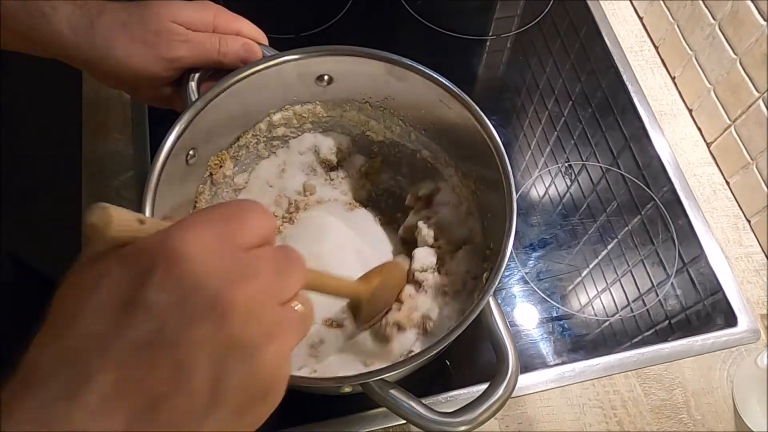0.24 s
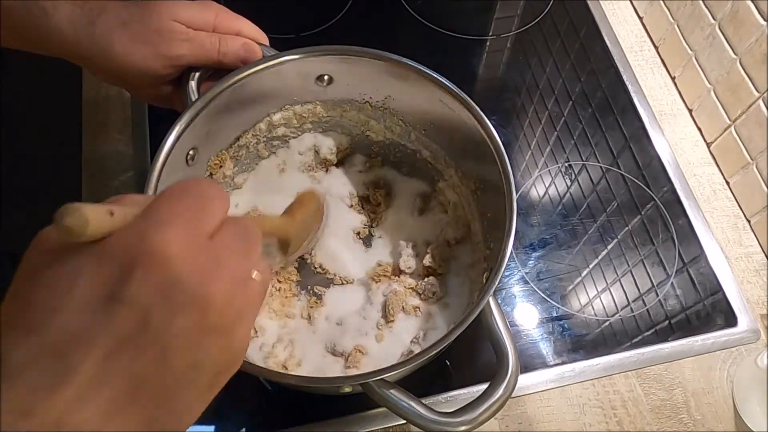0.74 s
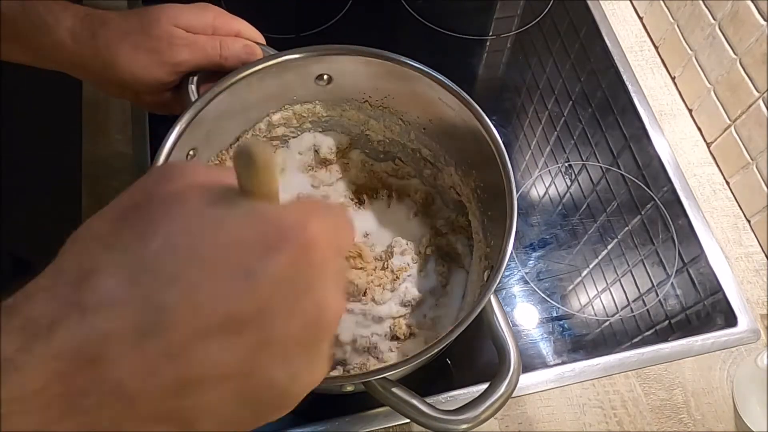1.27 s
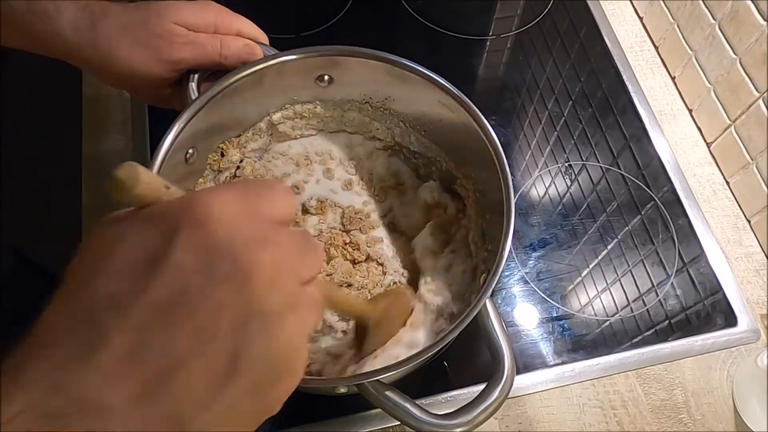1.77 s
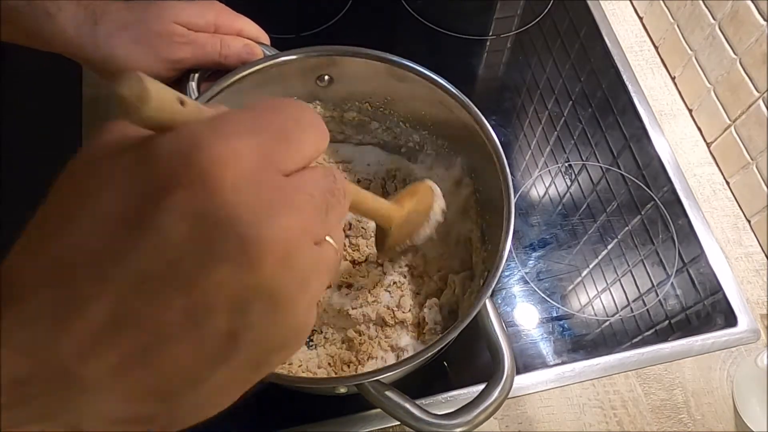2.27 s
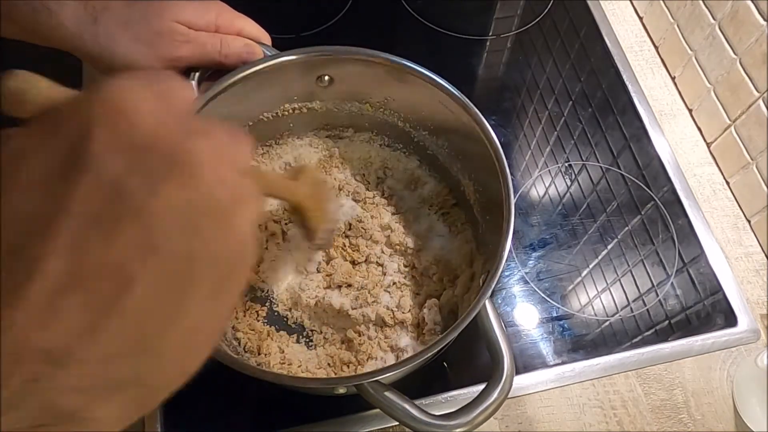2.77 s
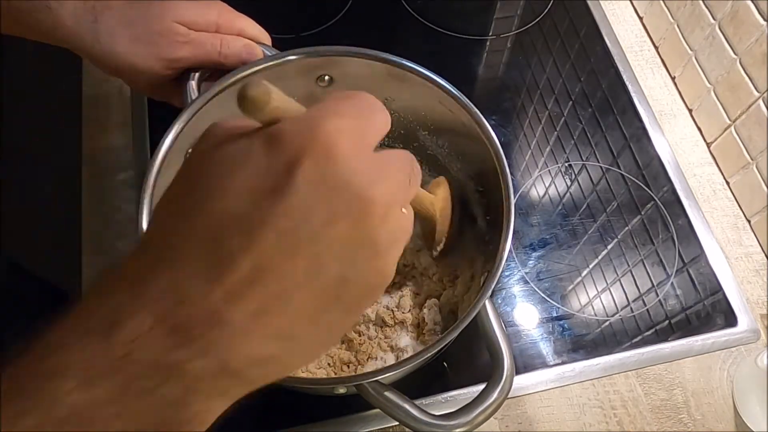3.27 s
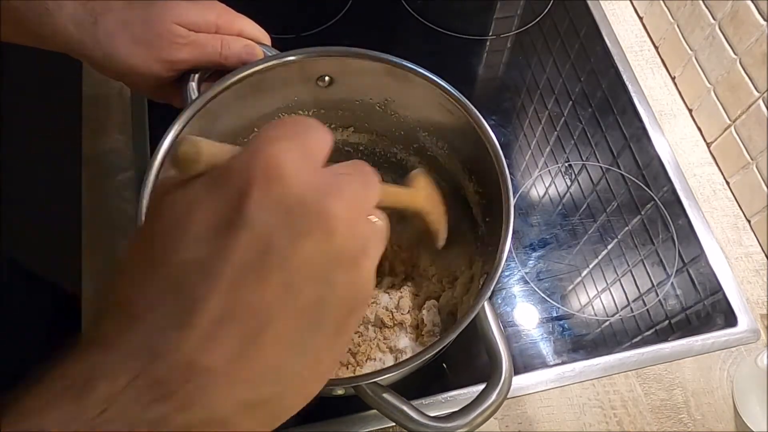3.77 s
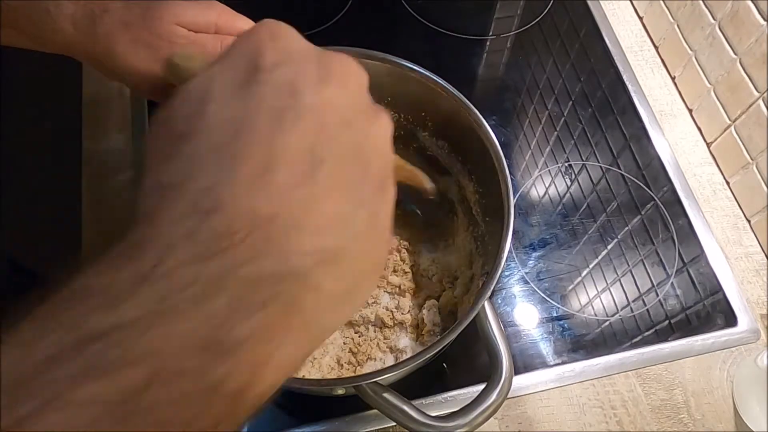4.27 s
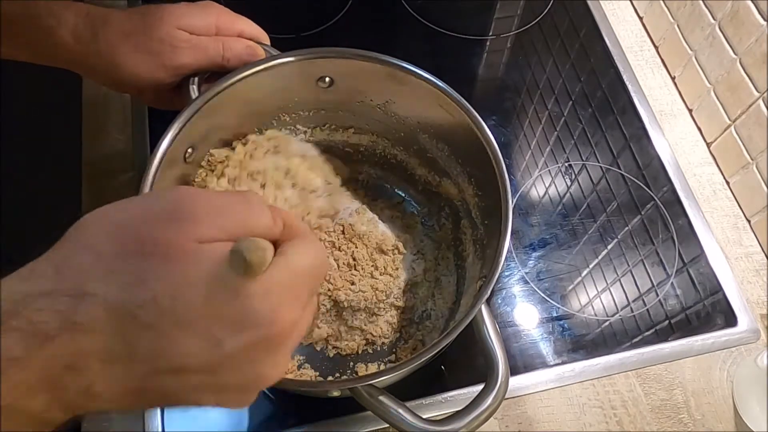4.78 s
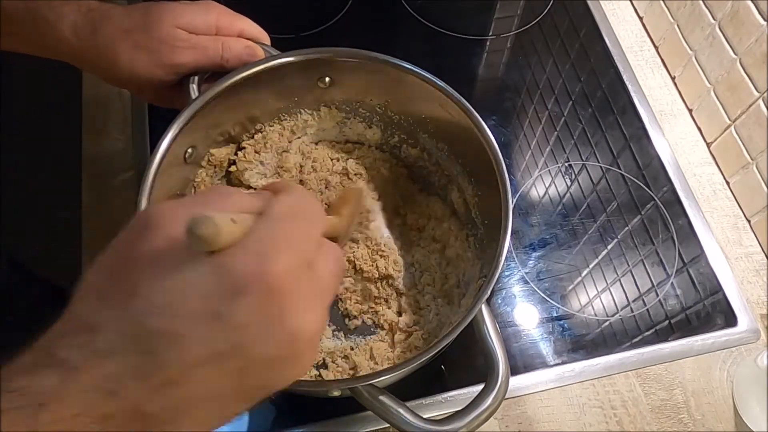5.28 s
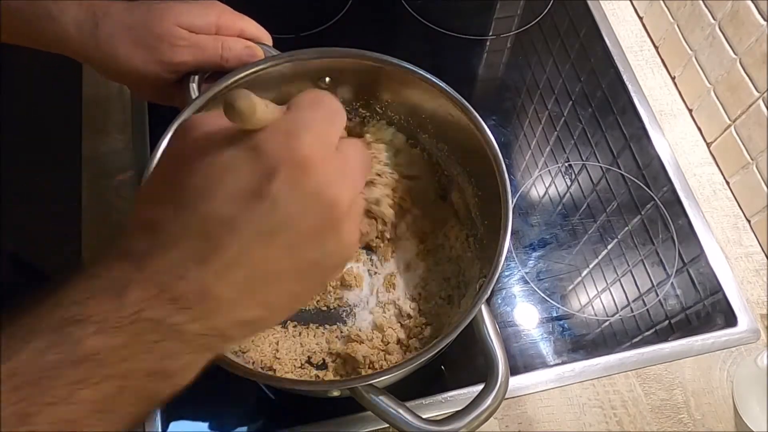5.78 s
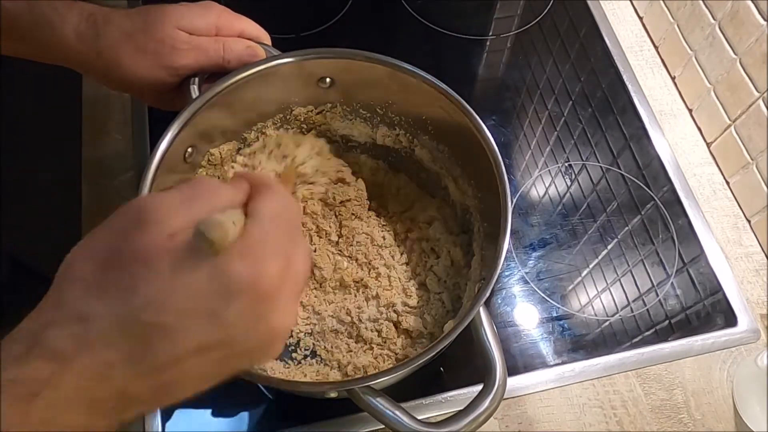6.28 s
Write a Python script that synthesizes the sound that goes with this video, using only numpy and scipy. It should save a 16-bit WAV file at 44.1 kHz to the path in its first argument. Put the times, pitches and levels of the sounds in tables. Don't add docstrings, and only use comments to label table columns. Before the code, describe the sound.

Sandy, crunchy stirring in a hand-damped steel pot, heard very close in stereo. Irregular spoon strokes hiss and crackle, with small ticks and a few sharp clacks on the wall. Midway the tilted pot bumps down in three rattling clusters with the loudest knocks; after a pause comes a heavy low thump, then busier scraping and tapping to the end. Little reverberation, quiet room hiss.

```python
import sys
import numpy as np
from scipy import signal
from scipy.fft import rfft, irfft, next_fast_len
from scipy.io import wavfile

SR = 44100
rng = np.random.default_rng(int(sys.argv[2]) if len(sys.argv) > 2 else 0)


def materialize(psi):
    bounded = np.clip(np.atleast_2d(psi).T, -1, 1)
    quanta = np.round(bounded * 32767).astype(np.int16)
    wavfile.write(sys.argv[1], SR, quanta)


def gain_from_db(level_db):
    decades = np.asarray(level_db, float) / 20
    return 10 ** decades


N = 287973
PADDED = next_fast_len(N + SR // 10)
HZ = np.arange(PADDED // 2 + 1) * SR / PADDED + 1e-3


def rms_one(x):
    return x / np.sqrt(np.mean(x ** 2) + 1e-20)


def at_hz(points):
    hz, value = np.transpose(points)
    return np.interp(np.log(HZ), np.log(np.maximum(hz, 1)), value)


def colour(x, spectrum, peaks=()):
    lift_db = sum(db / (1 + (2 * (HZ - hz) / width_hz) ** 2) for hz, width_hz, db in peaks)
    shaped = rfft(x, PADDED) * gain_from_db(at_hz(spectrum) + lift_db)
    return rms_one(irfft(shaped, PADDED)[:N])


def drift(rate_hz):
    r = np.exp(-80 * np.pi * rate_hz / SR)
    slow = signal.lfilter([1], [1, -2 * r, r * r], rng.standard_normal(N // 40 + 2002))
    slow = rms_one(slow[2000:])
    return np.interp(np.arange(N) / 40, np.arange(len(slow)), slow)


def ring(clicks, hz, t60_s):
    r, w = gain_from_db(-60 / (t60_s * SR)), 2 * np.pi * hz / SR
    return signal.lfilter([0, np.sin(w)], [1, -2 * r * np.cos(w), r * r], clicks + 1e-18)


def swell(t, s, half_s):
    return np.exp(-((t - s) / half_s) ** 2 / 2)


# f/Hz, density/dB per Hz
AIR = [(15, -21), (25, 9), (66, -18), (189, -8.5), (881, -23.5), (1320, -23), (2590, -34), (7630, -42),
       (15800, -80)]


def room_air():
    return np.array([colour(hiss, AIR) for hiss in rng.standard_normal((2, N))])


def kitchen(x, t60_s=.25):
    t = np.arange(round(.4 * SR)) / SR
    tail = rng.standard_normal((2, len(t))) * gain_from_db(-60 * t / t60_s) * (t > .004)
    tail = signal.lfilter([1, -1], [1, -.95], tail)
    return signal.fftconvolve(x[None], tail / np.linalg.norm(tail[0]), axes=1)[:, :N]


# t/s, lowest plate mode level/dB, higher plate modes/dB re lowest,
# pot/dB re lowest, upper plate modes extra/dB
SHOVES = [(0.185, -20, -25, -16, 10), (.36, -35.5, -10, -22, -1), (0.864, -49, -11, -3, -12),
          (1.742, -40.5, -3, -11, 2), (1.799, -42.5, -9, -8, -12), (1.901, -40.5, -18, -24, 4),
          (1.961, -45.5, -1, -21, -6), (2.68, -49.5, 5, -7, 3), (2.912, -74, -3, -16, -2),
          (3.221, -53.5, 5, 3, 1), (4.911, -52, -9, -14, 6), (5.599, -57, -10, -19, -7),
          (6.12, -42, -5, -2, 1), (6.297, -48, -8, -14, -9), (0.396, -34.5, -50, -22, -11),
          (1.028, -33.5, -16, -37, 24.5), (1.076, -41.5, -11.5, -24, 22), (1.61, -23.5, -13, -27.5, -3),
          (3.543, -33.5, -13.5, -16, 3), (3.649, -39, -21, -30, -11), (3.709, -32.5, -10.5, -30, -13),
          (3.775, -42, -6, -14, -7), (3.951, -23, 1, -15.5, -9), (4.462, -24, -19, -18, 20),
          (4.481, -48.5, 6.5, -16, 13), (4.512, -5.5, -15.5, -24, -3), (4.522, -29, -13.5, -20, 6),
          (1.44, -37, -6, -9, -9), (1.255, -47, -8, -28, -3), (4.87, -50, -18, -19, 2),
          (5.105, -33, -12, -19, -2), (4.596, -26.5, -25, -16, 4), (4.75, -22, -12.5, -21, -21),
          (5.039, -22.5, -7, -12.5, -1), (5.389, -39, -38, -19, -6), (5.449, -28.5, -13.5, -44, -8),
          (5.81, -30.5, -15, -7.5, 3), (5.886, -18.5, -18, -39, -6), (5.971, -37, -26, -34, 3)]
# t/s, lowest plate mode level/dB, higher plate modes/dB re lowest,
# pot/dB re lowest, rebound loss/dB
ROCKS = [(0.025, -30, -7.5, -18.5, 5.3), (0.616, -25.5, -15.5, -25, 7.4), (1.009, -21.5, -9.5, -23, 1.5),
         (1.122, -24.5, -11, -39, 0.85), (1.361, -20.5, -13, -17, 7.2), (1.674, -26.5, -3.5, -8, 13),
         (2.08, -31.5, 0.5, 2, 4), (2.225, -25, -10, -13, 16), (3.988, -12, -11.5, -18, 12),
         (4.072, -20, -14, -14.5, 4.3), (4.623, -17, -20, -27, 6.6), (5.063, -25, -1, -10, 15),
         (5.176, -25.5, -12, -9, 6), (6.055, -36.5, -9, -11, 1), (6.199, -23.5, -12.5, -11, 5.6),
         (6.464, -22, -11.5, -20.5, 2.8)]
# t/s, level/dB into middle plate, upper plate, bottom, side
SLAMS = [(2.514, -51, -27.5, -26, -27), (2.542, -26, -19.5, -37, -34), (2.57, -39, -27.5, -41, -51),
         (2.591, -36.5, -47, -44, -55), (3.051, -51, -20, -30, -31.5), (3.074, -29.5, -16.5, -33, -46),
         (3.098, -47, -21, -39, -41), (3.122, -34.5, -52, -39, -47), (3.14, -41, -41, -41, -57),
         (3.405, -43, -16, -30, -31), (3.413, -23, -30, -34, -37), (3.43, -24, -30, -36, -33.5),
         (3.451, -30, -28.5, -30.5, -39), (3.48, -54, -43, -38, -37.5)]
REBOUND_S, UPPER_DB, SIDE_DB = .041, 0, -11.5
SLAM_LOWEST_DB = -24


def touches():
    rocks = [(s + late_s, db - loss_db * (late_s > 0), plate_db, pot_db, UPPER_DB)
             for s, db, plate_db, pot_db, loss_db in ROCKS for late_s in (0, REBOUND_S)]
    rows = []
    for s, db, plate_db, pot_db, upper_db in SHOVES + rocks:
        middle_db, bottom_db = db + plate_db, db + pot_db
        rows.append((s, db, middle_db, middle_db + upper_db, bottom_db, bottom_db + SIDE_DB))
    for s, middle_db, *others_db in SLAMS:
        rows.append((s, middle_db + SLAM_LOWEST_DB, middle_db, *others_db))
    return np.array(rows)


# f/Hz, level/dB, t60/s
PLATE_LOW = [(93.9, 6.5, 0.17), (80, -47.5, 0.077)]
PLATE_MIDDLE = [(142.2, 8.5, 0.18), (103.9, -15, 0.49)]
PLATE_UPPER = [(186.8, 5.16, 0.15), (217.7, 1.5, 0.14)]
POT_BOTTOM = [(264.4, 1.5, 0.061), (293.5, -6.5, 0.18), (343.6, -4.5, 0.091), (373, -4.5, 0.14),
              (418.5, -5.5, 0.1), (459, -3.5, 0.1), (503, -15, 0.12)]
POT_SIDE = [(610, 0.5, 0.1), (660, -2.5, 0.11), (731, -8.5, 0.22), (772, -7.5, 0.12), (868, -9, 0.13)]
JUDDER_DB, JUDDER_FADE_S = -4.5, 0.0069


def thuds():
    rows, out = touches(), np.zeros(N)
    at = np.round(rows[:, 0] * SR).astype(int)
    groups = [PLATE_LOW, PLATE_MIDDLE, PLATE_UPPER, POT_BOTTOM, POT_SIDE]
    for column, modes in enumerate(groups, 1):
        for hz, db, t60_s in modes:
            push = np.zeros(N)
            push[at] = -gain_from_db(rows[:, column] + db)
            if column > 3:
                push[at] *= gain_from_db(2 * rng.standard_normal(len(at)))
                fade = np.exp(-1 / (JUDDER_FADE_S * SR))
                shake = signal.lfilter([1], [1, -fade], push + 1e-18) * rng.standard_normal(N)
                push = push + gain_from_db(JUDDER_DB) * 0.13 * shake
            soft = np.exp(-2 * np.pi * 1.375 * hz / SR)
            push = signal.lfilter([(1 - soft) ** 2], [1, -2 * soft, soft ** 2], push + 1e-18)
            leak = np.exp(-2 * np.pi * 1.066 * hz / SR)
            out += ring(signal.lfilter([1, -1], [1, -leak], push), hz, t60_s)
    return out


# t/s, level/dB, tilt/dB per octave
RINGS = [
    (2.517, -38, 5),
    (2.6756, -45.5, 11),
    (3.051, -24, 0.5),
    (3.087, -33, 1.5),
    (3.183, -56, 14),
    (3.403, -32, -3),
    (3.991, -50, 10),
    (4.119, -40, 4),
    (4.461, -55.5, 21.5),
    (6.46, -38.5, 11),
]
# f/Hz, level/dB, t60/s
FREE_WALL = [(1010, -3, 0.045), (1345, -9, 0.09), (1530, -18, 0.15), (1650, -11.5, 0.046),
             (2080, -11, 0.17), (2430, -15.5, 0.051)]


def free_wall():
    s, db, tilt_db = np.transpose(RINGS)
    out = np.zeros(N)
    for hz, mode_db, t60_s in FREE_WALL:
        push, luck = np.zeros(N), rng.standard_normal((len(s), 2))
        for late_s, share in zip((0, .004), luck.T):
            tap_db = db + mode_db - 0.5 + tilt_db * np.log2(hz / 1000) + 2 * share
            push[np.round((s + late_s) * SR).astype(int)] = gain_from_db(tap_db) * np.sign(share)
        out += ring(signal.lfilter([.25], [1, -.75], push + 1e-18), hz, t60_s)
    return out


# t/s, f/Hz, level/dB
FAVOURED = [(1.0068, 1840, -20), (1.0068, 2350, -22), (1.0068, 5760, -22), (1.0068, 8210, -30),
            (1.0068, 3350, -21), (1.1677, 4660, -33), (1.155, 1850, -39), (1.134, 1800, -39),
            (1.182, 4400, -36), (1.3408, 4850, -36), (1.5418, 1890, -38), (2.0805, 4680, -32),
            (2.0805, 6470, -32), (2.5146, 6200, -30), (2.5146, 6890, -30), (2.516, 370, -32),
            (2.518, 770, -34), (2.58, 750, -44), (2.677, 1010, -42), (3.049, 4600, -24), (3.049, 7720, -27),
            (3.049, 1020, -28), (3.049, 3610, -30), (3.078, 1010, -34), (3.4025, 1060, -26),
            (3.4025, 2540, -21), (3.4025, 7260, -18), (3.4025, 3500, -28), (3.408, 420, -30),
            (3.432, 1010, -35), (3.435, 660, -37), (3.458, 1010, -37), (3.486, 1010, -40),
            (3.505, 400, -40), (3.9472, 4400, -27), (3.9472, 5260, -23), (3.9472, 7650, -27),
            (4.0745, 2500, -28), (4.0745, 3460, -30), (4.4597, 2010, -29), (4.4597, 5720, -30),
            (4.512, 431, -24), (4.511, 540, -29), (4.53, 240, -26), (4.535, 980, -44), (5.8081, 4470, -30),
            (5.81, 360, -34), (5.812, 280, -37), (5.845, 350, -41), (5.897, 460, -42), (5.897, 350, -43),
            (6.1333, 1910, -40), (6.4596, 2400, -27), (6.4596, 6200, -29), (6.4596, 1050, -31)]
FAVOURED_CYCLES, FAVOURED_SHORTEST_S, FAVOURED_RISE_CYCLES = 23, 0.0078, 0.78


def favoured():
    out, t = np.zeros(N + SR), np.arange(round(.2 * SR)) / SR
    for s, hz, db in FAVOURED:
        t60_s = FAVOURED_SHORTEST_S + FAVOURED_CYCLES / hz
        swing = (1 - np.exp(-t * hz / FAVOURED_RISE_CYCLES)) * gain_from_db(-60 * t / t60_s)
        i = round(s * SR)
        out[i:i + len(t)] += gain_from_db(db) * swing / swing.max() * np.sin(2 * np.pi * hz * t)
    return out[:N]


# t/s, peak level/dB, struck f/Hz, brightness/dB, scattering crumbs/dB
KNOCKS = [(.181, -24.5, 2180, -14, -16), (1.0065, -16.5, 4340, -20, -10.5), (1.296, -24.5, 2170, -40, -9),
          (1.608, -25, 1930, -95, -27), (1.668, -25.5, 1510, -11, -10), (2.0816, -20.5, 3400, 9, -12),
          (2.227, -19.5, 4700, -43, -20), (2.237, -20, 1980, -39, -17.5), (2.5145, -16.5, 3660, 9.5, -20),
          (2.6629, -27.5, 3480, 2, -15), (2.6771, -22, 3880, -1, -12.5), (3.049, -10.5, 4270, -8, -23),
          (3.0826, -21, 2100, 11, -15), (3.4025, -9, 7300, 21, -33), (3.948, -14, 3130, -13, -11),
          (4.074, -15.5, 1580, -50, -14), (4.4597, -14, 5300, -9, -21), (4.511, -23, 4300, -39, -7),
          (4.708, -21, 3700, -6, -11), (5.0366, -22, 2390, 7, -9.5), (5.8085, -27, 4360, -8, -22),
          (6.4605, -15, 4350, -41, -21.5)]
# t/s, peak level/dB, struck f/Hz
TICKS = [(0.356, -36.5, 2240), (0.448, -35.5, 2400), (0.618, -30, 1530), (1.053, -32, 2440),
         (1.167, -39, 4560), (1.3436, -30, 5000), (1.382, -27.5, 3440), (3.037, -43, 4100),
         (3.1823, -35, 1540), (4.093, -47, 1510), (4.109, -33, 1820), (4.121, -33.5, 1510),
         (4.4347, -35, 7400), (4.694, -40, 4900), (5.903, -30, 6100), (6.011, -31, 1900),
         (6.1836, -26, 2320), (6.1947, -29, 2080), (6.507, -27, 6400), (0.0196, -40, 2000),
         (0.03, -36.5, 1900), (.296, -38, 2500), (0.751, -58, 1590), (0.7805, -50, 1520),
         (1.113, -39, 1870), (1.426, -38, 2700), (2.494, -68, 3480), (2.503, -50, 3000),
         (2.918, -47.5, 7440), (4.8424, -43, 1920), (5.174, -30, 1680), (5.399, -43, 3000),
         (5.608, -39, 1680), (5.8596, -38, 2090), (5.9302, -26.5, 5030), (6.0878, -35, 1840),
         (6.189, -23.5, 3800), (6.422, -26.5, 2040)]
TICK_DULL_DB, TICK_BRIGHTER_DB_PER_OCTAVE, TICK_CRUMBS_DB = -49, 16, -14.5
# f/Hz, level/dB
WALL = [(1335, -25), (1560, -28), (2085, -2), (2400, 2.5), (3000, -16), (3500, -28.5), (3900, 5),
        (4500, 13), (5300, 15.5), (5900, 26), (6700, 23), (7400, 24), (7900, 10.5), (9500, -63)]
CONTACT_S, CONTACT_LONGER_DB_PER_DB = 0.00088, 0.42
CONTACT_RISE_S, CRUMBS_T60_S = 0.00039, 0.053


def knocks():
    out, t = np.zeros(N), np.arange(round(.1 * SR)) / SR
    ticks = []
    for s, db, hz in TICKS:
        bright_db = TICK_DULL_DB + TICK_BRIGHTER_DB_PER_OCTAVE * np.log2(hz / 2000)
        ticks.append((s, db, hz, bright_db, TICK_CRUMBS_DB))
    edges = signal.butter(2, [1300, 12000], "band", fs=SR, output="sos")
    for s, peak_db, struck_hz, bright_db, crumbs_db in KNOCKS + ticks:
        contact_s = CONTACT_S * gain_from_db(CONTACT_LONGER_DB_PER_DB * (peak_db + 31.0))
        contact = (1 - np.exp(-t / CONTACT_RISE_S)) * np.exp(-(t / contact_s) ** 2)
        scatter = gain_from_db(crumbs_db - 60 * t / CRUMBS_T60_S) * (t > .002)
        force = (contact + scatter) * rng.standard_normal(len(t))
        body = np.zeros(len(t))
        for (hz, db), luck_db in zip(WALL, 4 * rng.standard_normal(len(WALL))):
            mode_db = db + luck_db + (bright_db + 12) * np.log2(hz / 3500) / 2
            body += gain_from_db(mode_db) * ring(force, hz, .004 + 9 / hz)
        spot = ring(force, struck_hz, 0.0076 + 22 / struck_hz)
        snap = force * contact ** 4
        hit = rms_one(body) + gain_from_db(-2.0) * rms_one(spot)
        hit = signal.sosfilt(edges, hit + gain_from_db(-11.5 + bright_db / 7) * rms_one(snap))
        i = round(s * SR)
        out[i:i + len(hit)] += (gain_from_db(peak_db) * hit / np.abs(hit).max())[:N - i]
    return out


def grains(per_s, spread_db, lumps_db, lumps_per_s):
    sizes = gain_from_db(spread_db * np.minimum(rng.exponential(1, N), 4)) * rng.choice([-1, 1], N)
    crushed = rms_one(sizes * (rng.random(N) < per_s / SR))
    return (crushed + .65 * rng.standard_normal(N)) * gain_from_db(lumps_db * drift(lumps_per_s))


def played(rows):
    s, *columns_db = np.transpose(rows)
    return [gain_from_db(np.interp(np.arange(N) / SR, s, db)) for db in columns_db]


def patchy(x, depth_db, changes_per_s):
    edges_hz, out = 800 * 2 ** (np.arange(14) / 3), np.zeros(N)
    for k, pair_hz in enumerate(zip(edges_hz, edges_hz[1:])):
        band = signal.sosfilt(signal.butter(2, pair_hz, "band", fs=SR, output="sos"), x)
        out += (-1) ** k * band * gain_from_db(depth_db * drift(changes_per_s))
    return out


# t/s, half-length/s, f/Hz, level/dB
RUBS = [(0.813, .035, 1500, -55.5), (0.917, 0.015, 1340, -57), (1.15, 0.02, 1800, -49),
        (1.153, 0.024, 4600, -51), (2.827, 0.019, 1380, -60), (4.955, 0.02, 1840, -57),
        (5.785, .022, 1950, -54), (3.3, .05, 2200, -66), (6.14, .025, 1950, -54), (6.22, .022, 2050, -53),
        (6.41, .03, 1950, -52), (4.102, 0.03, 1480, -48)]
RUB_WIDTH = .08


def rubbing(crumbs):
    t, out = np.arange(N) / SR, np.zeros(N)
    for s, half_s, hz, db in RUBS:
        song = rms_one(ring(crumbs, hz, 2.7 / (RUB_WIDTH * hz)))
        out += gain_from_db(db) * swell(t, s, half_s) * song
    return out


# t/s, level/dB, brightness/dB, weight on the hob/dB
PRESSURE = [(0, -59.5, 0.5, -51), (.3, -56.5, -2, -49), (.75, -64, -5.5, -68), (1.1, -55, -2.5, -51),
            (1.65, -56.5, 1.5, -48.5), (2.0, -58.5, -2, -57.5), (2.2, -62.5, 5, -41.5),
            (2.7, -59.5, 3.5, -62), (3.15, -62.5, -5.5, -55), (3.5, -54, 3, -48.5), (3.93, -68.5, -4, -69),
            (4.05, -56, -3.5, -45.5), (4.64, -58, -0.5, -46), (5.05, -58, 0, -60), (5.3, -61.5, -4, -56),
            (5.73, -63, 1, -71), (5.85, -57, 1.5, -45.5), (6.53, -54.5, -2, -55)]
# leaves t/s, lands t/s, quieter/dB, duller/dB
LIFTS = [
    (0.885, 0.993, 12.5, -10.5),
    (2.338, 2.513, 21.5, 2),
    (2.824, 3.036, 20, -6.5),
    (3.19, 3.384, 11.5, 5.5),
    (4.185, 4.455, 22.5, -3),
]
LIFT_S, LIFT_FREES_HOB = 0.089, 0.88
# t/s, half-length/s, level/dB, brightness/dB, extra crunch/dB
SWEEPS = [(0.157, 0.057, -55, -3.5, 2.5), (0.608, 0.08, -71, 10, 11), (0.83, 0.019, -57, -7.5, -15),
          (1.183, 0.053, -57, 3, 9.5), (1.365, 0.023, -53.5, 2.5, 4.5), (1.61, 0.066, -63, -12.5, 8),
          (2.101, 0.024, -59, -5.5, 11), (2.216, 0.057, -51, -3.5, 2.5), (2.637, 0.052, -68, 6, 17.5),
          (2.799, 0.039, -60, -6, 2), (3.2, 0.032, -62.5, 3.5, 3), (3.944, 0.0036, -53.5, 8, 2),
          (3.987, .015, -47, -0.5, 4.5), (2.335, 0.014, -61.5, 3, 9), (3.345, 0.058, -83, -11, 0),
          (0.954, 0.047, -70.5, -6.5, 5), (2.453, 0.042, -93, 4, 0), (5.247, 0.015, -65.5, 3, 4),
          (5.513, 0.059, -69, -11, -5), (5.653, 0.037, -60.5, -2, 4), (5.81, .015, -56.5, -7.5, 11.5),
          (4.124, 0.014, -55, -7, -16), (6.19, .008, -64, -5, 1), (6.461, 0.0027, -43, 6, -7),
          (1.007, 0.0034, -46, 6, 5), (1.453, .03, -70, -12.5, -2), (4.085, 0.016, -48.5, -6.5, 1),
          (4.714, 0.031, -56.5, 2, 6.5), (4.96, 0.022, -68.5, -14, -9), (5.358, 0.028, -60.5, -5.5, 2),
          (5.848, 0.075, -56.5, -7.5, 3.5), (6.172, 0.055, -52.5, -2.5, 3.5), (6.412, 0.028, -57, -8, 1),
          (6.478, 0.026, -47, 0, 0)]
# t/s, level/dB, brightness/dB, extra crunch/dB, fall/dB per s
DIGS = [
    (1.005, -52, 5.5, 7, 156),
    (2.513, -60.5, -13, 14.5, 118),
    (3.052, -47, 2.5, 12, 204),
    (3.404, -43.5, -4.5, 1, 123),
    (3.95, -50.5, 0.5, 6, 196),
    (4.457, -54, 8.5, 14.5, 156),
    (5.027, -50.5, 3, 2.5, 106),
]
CRUNCH_DB, GRIT_DB, DRAG_DB = -0.5, 1.5, -3.5


def stroke():
    t = np.arange(N) / SR
    lifted_db, duller_db = sum(np.outer(db, np.clip((t - s) / LIFT_S, 0, 1) * (t < lands_s))
                               for s, lands_s, *db in LIFTS)
    level, bright, weight = played(PRESSURE)
    level, bright = level * gain_from_db(-lifted_db), bright * gain_from_db(-duller_db)
    strokes = [(level, bright, 1)]
    for s, half_s, db, bright_db, crunch_db in SWEEPS:
        strokes.append((gain_from_db(db) * swell(t, s, half_s), gain_from_db(bright_db), gain_from_db(crunch_db)))
    for s, db, bright_db, crunch_db, fall_db_per_s in DIGS:
        run_off = gain_from_db(db - fall_db_per_s * np.abs(t - s)) * (t > s)
        strokes.append((run_off, gain_from_db(bright_db), gain_from_db(crunch_db)))
    grind = np.sqrt(sum((g / b) ** 2 for g, b, c in strokes))
    crunch = np.sqrt(sum((g * c) ** 2 for g, b, c in strokes))
    grit = np.sqrt(sum((g * b) ** 2 for g, b, c in strokes))
    rumble = weight * gain_from_db(-LIFT_FREES_HOB * lifted_db)
    return grind, gain_from_db(CRUNCH_DB) * crunch, gain_from_db(GRIT_DB) * grit, gain_from_db(DRAG_DB) * level, rumble


# f/Hz, density/dB per Hz
GRIND = [(500, -57), (850, -18.5), (1280, 12.5), (1410, -3), (2600, -8.5), (3400, -18), (6160, -120)]
CRUNCH = [(1530, -59), (2600, -10.5), (4110, 2), (5600, -6.5), (7280, -24.5), (12300, -120)]
GRIT = [(3180, -17), (5200, 1), (6300, 2.5), (7900, 3.5), (10000, -9), (12300, -15.5), (14100, -25),
        (15800, -49)]
SIFT = [(6000, -23), (9000, 1), (12500, 16), (14300, -6), (15800, -54.5)]
DRAG = [(150, -65.5), (250, -33.5), (503, -8), (950, -24.5), (1240, -40), (2090, -120)]
RUMBLE = [(15, -73), (25, 2), (92, 6.5), (162, -3.5), (270, -15), (300, -10.5), (390, -28), (660, -120)]
SIFT_DB, SIFT_FOLLOWS = -75, 0.68
# f/Hz, width/Hz, level/dB
SINGING = [(1241, 227, -15.5), (1640, 150, -1), (1950, 380, 3), (3560, 630, 3), (4650, 360, 3.5)]
# f/Hz, width/Hz, level/dB
HOB_RING = [(96.6, 24, -4.5), (134, 37, 3), (207.7, 18, 11.5)]


def stirring():
    sand = grains(2200, spread_db=3.5, lumps_db=1.0, lumps_per_s=33)
    sugar = grains(15000, spread_db=1.5, lumps_db=.3, lumps_per_s=12)
    stutter = grains(400, spread_db=5.0, lumps_db=-0.5, lumps_per_s=17)
    grind, crunch, grit, drag, rumble = stroke()
    high = grind * colour(sand, GRIND, SINGING)
    high += crunch * colour(sand, CRUNCH, SINGING)
    high += grit * colour(sugar, GRIT, SINGING)
    sift_gain = gain_from_db(SIFT_DB) * (grit / grit.mean()) ** SIFT_FOLLOWS
    sift = sift_gain * colour(rng.standard_normal(N), SIFT)
    low = drag * colour(stutter, DRAG) + rumble * colour(stutter, RUMBLE, HOB_RING)
    return patchy(high, depth_db=1.8, changes_per_s=9) + low + sift + rubbing(sand)


# f/Hz, level/dB
MICROPHONE = [(20, 6.5), (50, -7), (100, -4), (7800, -1), (9800, 0), (11500, -2), (14000, 0.5),
              (16000, -11)]
# f/Hz, level/dB
PORT_DB = [(60, 2.4), (400, 1), (1500, 1.2), (5000, 3.7), (9000, 1.5), (14000, -7)]
# f/Hz, share
LIKENESS = [(150, .985), (300, .96), (600, .93), (2000, .86), (8000, .8), (14000, .4)]
HAND_ECHOES_S = [.00031, .00073, .00127]
LEFT_LAG_S = 4.2e-5


def ports(x):
    alike, direct = np.clip(at_hz(LIKENESS), 0, 1), rfft(x, PADDED)
    late = np.exp(-2j * np.pi * np.outer(HAND_ECHOES_S, HZ))
    smear = np.prod((late - .5) / (1 - .5 * late), axis=0)
    echoes = irfft(direct * smear, PADDED)[:N]
    turning = np.exp(2.5j * drift(6))
    moving = np.real(signal.hilbert(echoes, PADDED)[:N] * turning)
    response = gain_from_db(at_hz(MICROPHONE))
    own = np.sqrt(1 - alike) * rfft(moving, PADDED) * response
    common = np.sqrt(alike) * direct * response
    tilt = gain_from_db(at_hz(PORT_DB) / 2) * np.exp(-1j * np.pi * HZ * LEFT_LAG_S)
    return irfft(np.array([(common + own) * tilt, (common - own) / tilt]), PADDED)[:, :N]


def scene():
    pot = thuds() + free_wall() + favoured() + knocks() + stirring()
    return ports(pot) + gain_from_db(-18) * kitchen(pot) + gain_from_db(-63) * room_air()


def roll_off(x):
    return signal.sosfilt(signal.butter(12, 16470, fs=SR, output="sos"), x)


def record(dry):
    bass_cut = signal.butter(3, 52, "high", fs=SR, output="sos")
    top_cut = signal.butter(8, 15700, fs=SR, output="sos")
    return roll_off(signal.sosfilt(np.vstack([bass_cut, top_cut]), dry))


dry = scene()
out = record(dry)
materialize(out)
```